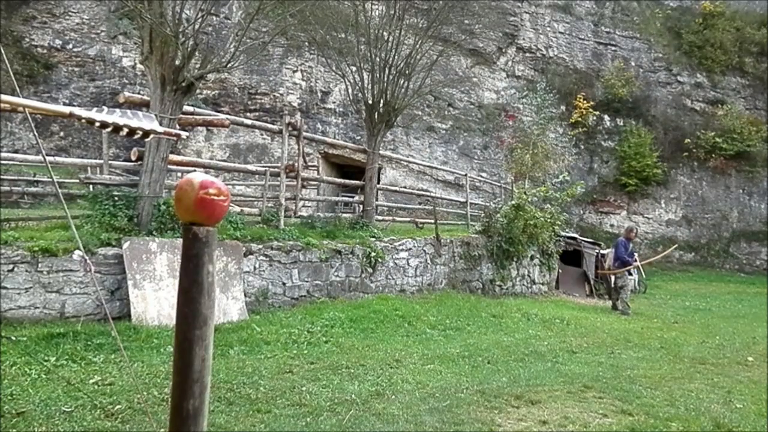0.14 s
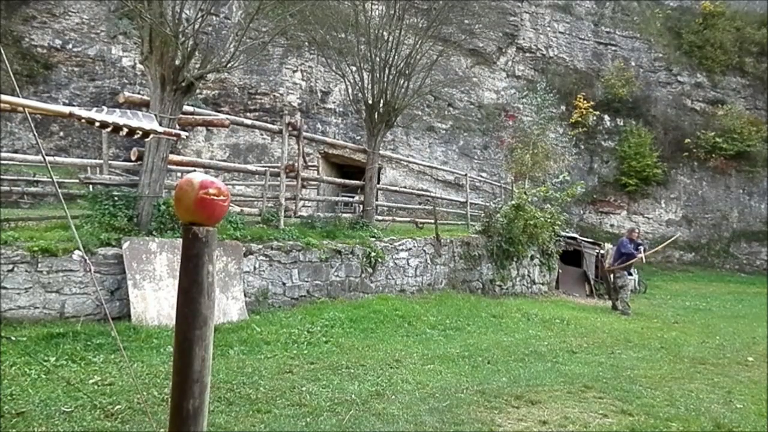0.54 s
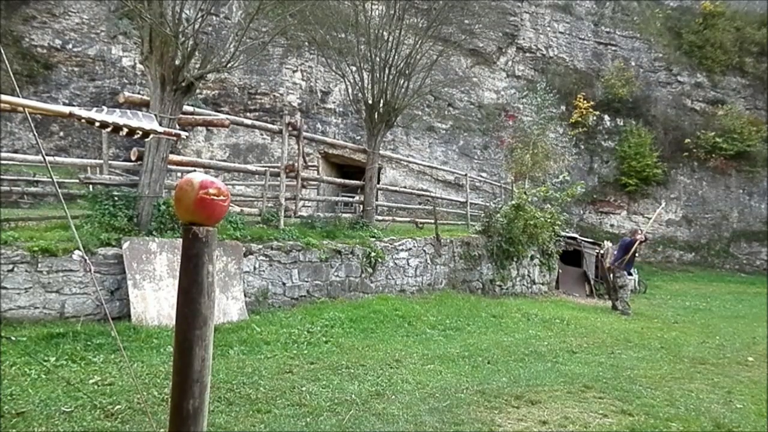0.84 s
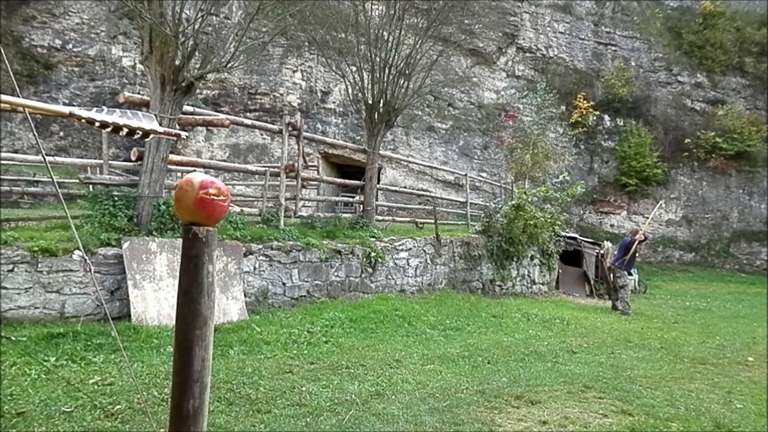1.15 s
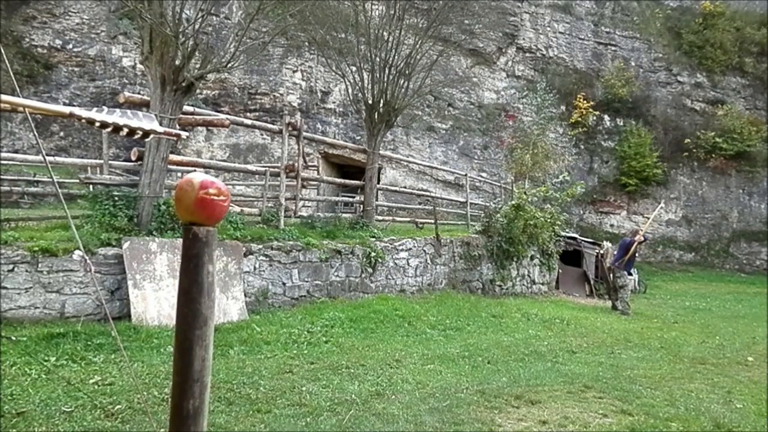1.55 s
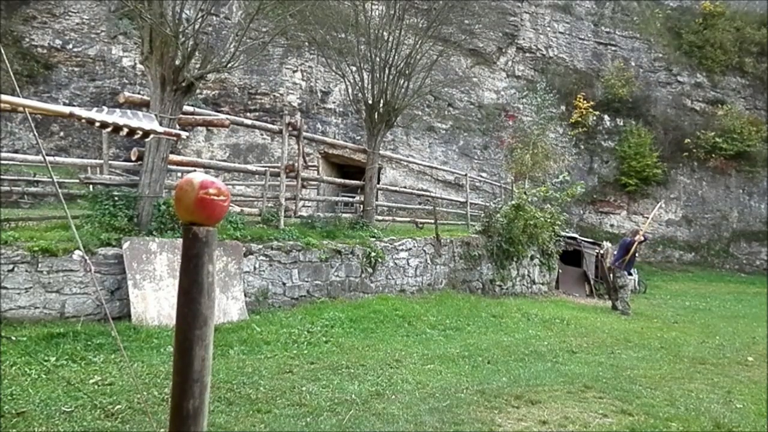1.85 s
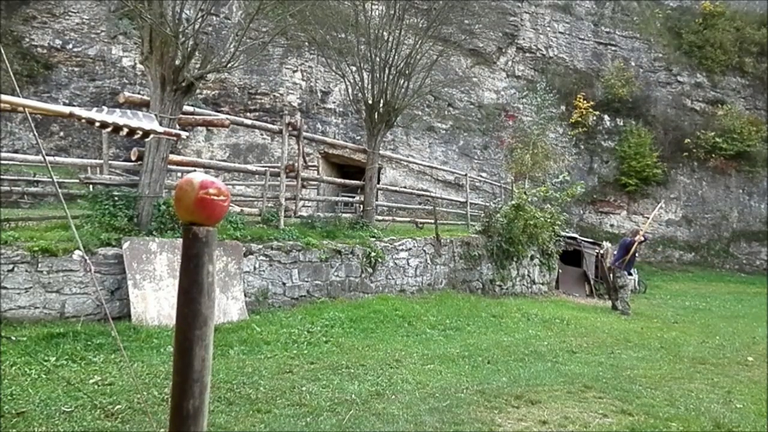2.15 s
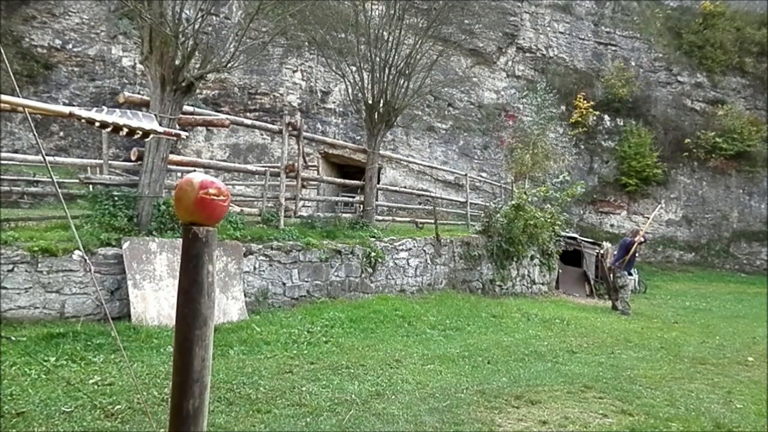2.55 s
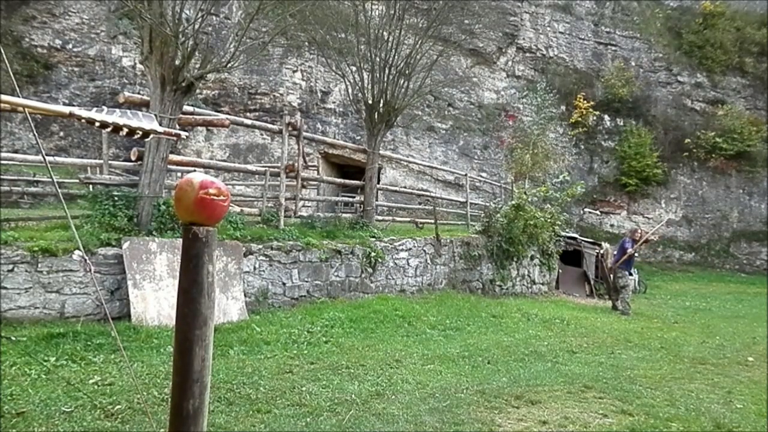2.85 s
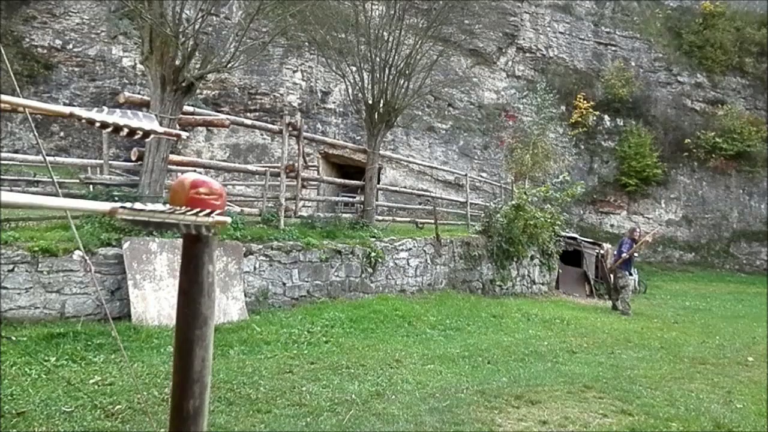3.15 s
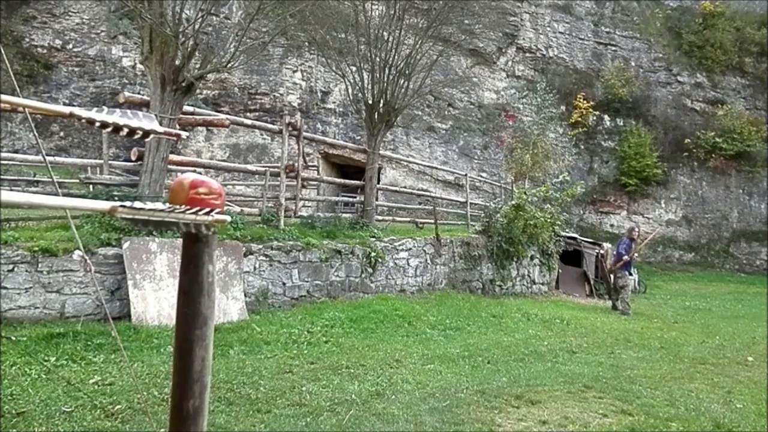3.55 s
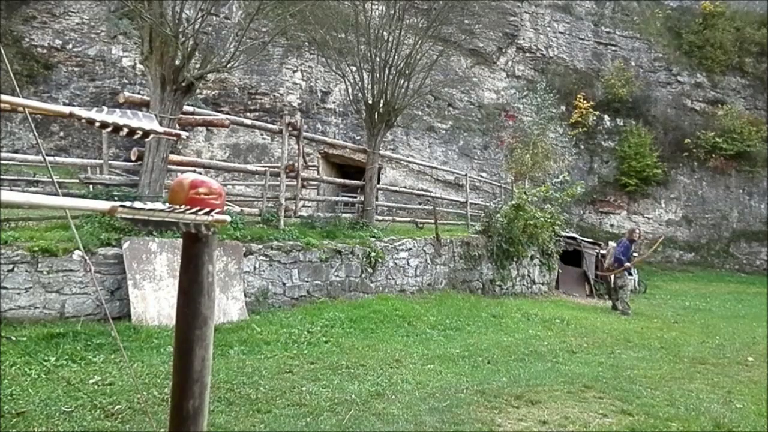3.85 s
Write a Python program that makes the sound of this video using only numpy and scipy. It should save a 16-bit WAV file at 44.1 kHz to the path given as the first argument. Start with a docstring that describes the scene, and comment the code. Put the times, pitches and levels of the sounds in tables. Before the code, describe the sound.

An arrow hits an apple on a wooden post outdoors. Low wind runs throughout, with faint rapid ticking and a thin high whine. At about 2.7 seconds a distant bowstring thumps with a light clack, and feathers hiss closer. At 3 seconds comes a close, sharp crunch and thud, then two quick shaft knocks and a faint feather rustle. The background dips afterwards and recovers toward 4 seconds.

```python
"""Low wind on a meadow under a cliff, with the camera's own faint ticking and thin whine.
An archer 18 m off lays an arrow on the bow and looses it: the string thumps, the shaft clacks past.
The feathers hiss nearer and the cliff scatters the hiss back. Close to the microphone the point
crunches into an apple on a wooden post; the post thuds and the swinging shaft knocks on it twice.
The camera's gain control ducks after the hit and slowly recovers."""
import sys
import numpy as np
from scipy import signal
from scipy.fft import rfft, irfft
from scipy.io import wavfile
from scipy.ndimage import uniform_filter1d, minimum_filter1d

SR = 44100
rng = np.random.default_rng(int(sys.argv[2]) if len(sys.argv) > 2 else 0)


def unload_wav(signal):
    """Save mono or channel-first audio to the path in sys.argv[1] as 16-bit WAV at rate SR, clipped to [-1, 1]."""
    wavfile.write(
        sys.argv[1],
        SR,
        np.round(np.clip(np.atleast_2d(signal).T, -1, 1) * 32767).astype(np.int16),
    )


N = 176400
T = np.arange(N) / SR
RELEASE_S, HIT_S = 2.693, 2.9929

# Low wind and distant rumble. Each row: frequency in Hz, relative density in dB.
WIND_SPECTRUM = [(20, -11.5), (45, -3), (90, 0.5), (160, 1.5), (400, -4.5), (660, -9), (1100, -21.5),
                 (1600, -36.5), (3000, -57), (6000, -79)]
# Faint hiss above the wind. Each row: frequency in Hz, relative density in dB.
HISS_SPECTRUM = [(900, -8.5), (1500, 0), (2600, -4.5), (4000, -17), (11800, -42), (12600, -14.5),
                 (14500, -12), (15500, -40)]
# That hiss sinks for a moment after the hit. Each row: time in seconds, gain in dB.
HISS_DIP = [(3.05, -0.5), (3.33, -26.5), (3.9, -3)]

# Strength of the camera's ticking. Each row: time in seconds, level in dB.
TICK_LEVELS = [(0, -59.5), (.5, -57.5), (.7, -70), (.92, -64), (1.17, -69), (1.3, -64.5), (1.45, -71),
               (1.8, -59.5), (2.25, -56), (2.55, -67.5), (3.15, -66), (3.3, -82), (3.68, -86),
               (3.76, -63.5)]
# Where the ticking falters. Each entry: time in seconds.
TICK_GAPS = [.614, 1.548, 2.415]
# Ring of a tick. Each row: frequency in Hz, gain in dB, t60 in seconds.
TICK_RESONANCES = [(4850, -7, .008), (6150, -12, 0.009), (7450, -4.5, .006), (8460, -2, 0.0052)]
# Rustle around a tick. Each row: frequency in Hz, relative density in dB.
TICK_RUSTLE_SPECTRUM = [(4000, -21), (4850, 5.5), (5400, -14), (6100, 1.5), (6550, -13), (7100, 1.5),
                        (8900, 0.5), (9500, -41)]
# Tones of the electronics. Each row: frequency in Hz, rms level in dB.
WHINE_TONES = [(14955, -76), (15315, -78.5), (15375, -77.5), (15434, -82.5)]
# Narrow hiss under them. Each row: frequency in Hz, relative density in dB.
WHINE_SPECTRUM = [(14000, -44.5), (14800, 5), (15650, 1), (16000, -42)]

# The arrow is laid on the bow, then scrapes past it.
# Each row: start in seconds, level in dB, attack and t60 in seconds, centre and width in Hz.
ARROW_RUBS = [(0.54, -45, 0.0021, 0.026, 630, 300), (2.674, -47.5, .008, 0.12, 770, 250),
              (2.6912, -47.5, .005, .06, 8500, 13500), (2.7041, -35, .0003, .009, 9600, 1700),
              (2.704, -57.5, .002, 0.09, 8700, 1700), (2.682, -50, 0.014, 0.2, 1050, 1160)]
# The shaft clicks as it is loosed, then clacks against the bow.
# Each row: start in seconds, strength in dB, contact in seconds.
SHAFT_CLACKS = [(2.6738, -38.5, .00016), (2.7043, -37.5, .00008)]
# Ring of the shaft. Each row: frequency in Hz, gain in dB, t60 in seconds.
SHAFT_RESONANCES = [(500, -3.5, 0.047), (850, -8, 0.029), (1305, -9.5, 0.019), (2370, -8.5, .009),
                    (3300, -3.5, 0.0029), (4400, -6, .004)]
# The string drives the bow, then snaps taut.
# Each row: start in seconds, strength in dB, contact in seconds.
STRING_BLOWS = [(2.6908, -28.5, 0.0021), (2.6982, -39.5, 0.0019)]
# Ring of bow and string. Each row: frequency in Hz, gain in dB, t60 in seconds.
BOW_RESONANCES = [(65, -6, .2), (154, -3, 0.061), (238, -1.5, 0.064), (287, -3.5, .06), (421, -12.5, 0.066),
                  (548, -16.5, .2), (686, -7, .12), (1130, -15, .1)]
# Air rushing through the feathers. Each row: frequency in Hz, relative density in dB.
FLIGHT_SPECTRUM = [(600, -9), (2700, -8), (4000, -11.5), (7100, -12.5), (8500, -5), (11300, -11),
                   (15600, -4.5), (16000, -30)]

# The arrow drives in and the post kicks back.
# Each row: start in seconds, strength in dB, contact in seconds.
POST_KICKS = [(2.9927, -16.5, .0005), (2.9972, -16.5, .0012), (3.0078, -21, .0005), (3.026, -28, .002),
              (3.052, -36.5, .002)]
# Ring of post and apple. Each row: frequency in Hz, gain in dB, t60 in seconds.
POST_RESONANCES = [(42, -10, .36), (137, -2.5, .04), (201, -2, 0.037), (293, -1, .06), (368, -4.5, .04),
                   (482, -8, .035), (608, -12, 0.032), (809, -15, 0.021)]
# Fruit and wood split. Each row: start in seconds, level in dB, t60 in seconds.
SPLITS = [(2.9929, -21.5, .007), (2.9942, -25.5, 0.033), (2.9976, -32.5, 0.043), (3.022, -52, 0.19)]
# Colour of the crunch. Each row: frequency in Hz, relative density in dB.
CRUNCH_SPECTRUM = [(1200, -7.5), (1700, -8.5), (2400, -1.5), (3300, -6.5), (4200, -0.5), (5200, -6),
                   (6300, 4.5), (7200, 0.5), (8700, 6), (10300, -5), (12500, -5), (14800, 3),
                   (16500, -10.5)]
# Brief ring of point and shaft. Each row: frequency in Hz, gain in dB, t60 in seconds.
POINT_RESONANCES = [(6380, 3, 0.044), (7800, -1.5, 0.031), (8160, -3, .035), (9340, -4, .04),
                    (14800, 1.5, .04)]
# Quivering feathers. Each row: frequency in Hz, relative density in dB.
FEATHER_SPECTRUM = [(4000, -22.5), (8900, -9), (10300, -33), (12200, -1), (13200, 2.5), (16000, -11)]
# The shaft strikes the post. Each row: start in seconds, strength in dB, contact in seconds.
SHAFT_KNOCKS = [(3.0277, -27, .00004), (3.0763, -24, .00008), (3.0813, -27, 0.00072)]


def from_db(db):
    """Decibels to gain."""
    return 10 ** (np.asarray(db) / 20)


def butterworth(x, order, hz, kind):
    """Low-, high- or band-pass filter."""
    return signal.sosfilt(signal.butter(order, hz, kind, fs=SR, output="sos"), x)


def noise(spectrum):
    """Steady noise, rms 1, coloured by (Hz, dB) points."""
    hz, db = np.transpose(spectrum)
    f = np.maximum(np.arange(N // 2 + 1) * SR / N, 1)
    skirt = np.minimum(f / hz[0], 1) ** 2
    colour = from_db(np.interp(np.log(f), np.log(hz), db))
    x = irfft(rfft(rng.standard_normal(N)) * skirt * colour, N)
    return x / x.std()


def burst(start, attack, t60, hold=0):
    """Straight rise, an optional hold, then exponential decay; times in seconds."""
    rise = np.clip((T - start) / attack, 0, 1)
    return rise * from_db(-60 * np.maximum(T - start - attack - hold, 0) / t60)


def pushes(rows):
    """One rounded push of force for each (start s, dB, contact s)."""
    force = np.zeros(N)
    for start, db, contact in rows:
        shape = np.hanning(int(contact * SR) + 3)[1:-1]
        i = int(start * SR)
        force[i:i + len(shape)] += from_db(db) * shape / shape.sum()
    return force


def ring(force, modes):
    """A body answers a force with its decaying modes."""
    out = 0
    for hz, db, t60 in modes:
        r, w = from_db(-60 / (t60 * SR)), 2 * np.pi * hz / SR
        mode = signal.lfilter([0, np.sin(w)], [1, -2 * r * np.cos(w), r * r], force + 1e-18)
        out = out + from_db(db) * mode
    return out


def wind():
    """Dull air over the meadow sways slowly and flutters quickly, under a faint hiss."""
    sway_db = 0.61 * noise([(2, 0), (12, -6), (60, -60), (300, -140)])
    flutter_db = 0.92 * noise([(15, 0), (70, 0), (400, -60)])
    hiss = from_db(-73.5 + np.interp(T, *np.transpose(HISS_DIP))) * noise(HISS_SPECTRUM)
    return from_db(-49.3 + sway_db + flutter_db) * noise(WIND_SPECTRUM) + hiss


def camera_ticking():
    """Probably the lens motor: fifteen double ticks a second, each in a soft rustle, a few missed."""
    first_s, period_s, bounce_s, rustle_s = .0136, .066733, .00081, .015
    times = np.arange(first_s, T[-1] - period_s / 2, period_s)
    levels = np.interp(times, *np.transpose(TICK_LEVELS)) + rng.normal(0, 1.6, len(times))
    missed = np.abs(times[:, None] - TICK_GAPS).min(axis=1) < period_s / 2
    levels = np.where(missed, -120, levels)
    steps = pushes([(s, db, 0) for s, db in zip(times, levels)])
    bounces = pushes([(s + bounce_s, db - 3, 0) for s, db in zip(times, levels)])
    ticks = butterworth(ring(steps + bounces, TICK_RESONANCES), 8, [4200, 9000], "band")
    nearest = np.clip(np.round((T - first_s) / period_s).astype(int), 0, len(times) - 1)
    full_db, share = -57, 0.82  # the rustle follows only part of the ticks' swing from full strength
    rustle_db = full_db - 19.5 + share * (levels[nearest] - full_db)
    swell = np.exp(-.5 * ((T - times[nearest]) / rustle_s) ** 2)
    return ticks + from_db(rustle_db) * swell * noise(TICK_RUSTLE_SPECTRUM)


def camera_whine():
    """The electronics add thin high tones on a narrow, buzzing hiss."""
    tones = sum(np.sqrt(2) * from_db(db) * np.sin(2 * np.pi * (hz * T + rng.random()))
                for hz, db in WHINE_TONES)
    buzz = 1 + .7 * np.sin(2 * np.pi * 59.94 * T)
    return tones + from_db(-73) * buzz * noise(WHINE_SPECTRUM)


def bow():
    """Across the meadow the arrow rubs and clacks on the bow, and the string thumps."""
    rubs = 0
    for start, db, attack, t60, hz, width in ARROW_RUBS:
        edges = np.clip([hz - width / 2, hz + width / 2], 200, .45 * SR)
        friction = butterworth(rng.standard_normal(N), 2, edges, "band")
        rubs = rubs + from_db(db) * burst(start, attack, t60) * friction / friction.std()
    clacks = ring(pushes(SHAFT_CLACKS), SHAFT_RESONANCES)
    thump = ring(pushes(STRING_BLOWS), BOW_RESONANCES)
    return rubs + clacks + butterworth(thump, 2, 55, "high")  # a small body radiates little deep bass


def arrow_flight():
    """Feather hiss grows as it nears the microphone, over the fading scatter from the cliff."""
    archer_m, post_m, falloff = 18, 3.5, 1.8
    distance = np.interp(T, [RELEASE_S, HIT_S], [archer_m, post_m])
    airborne = (T > RELEASE_S) & (T < HIT_S)
    direct = from_db(-51.5) * (post_m / distance) ** falloff * airborne
    cliff = from_db(-60) * burst(RELEASE_S, attack=0.013, t60=0.37)
    return np.hypot(direct, cliff) * noise(FLIGHT_SPECTRUM)


def post_thud():
    """The nearby post takes the blow; it radiates little deep bass and the soft fruit muffles it."""
    thud = ring(pushes(POST_KICKS), POST_RESONANCES)
    thud = butterworth(thud, 2, 77, "high")
    return butterworth(thud, 4, 1010, "low")


def point_crunch():
    """The point tears through fruit and wood in grainy bursts and rings briefly."""
    tearing = sum(from_db(db) * burst(start, 0.00014, t60) for start, db, t60 in SPLITS)
    roughness = 0.25
    grain = np.exp(roughness * noise([(300, 0), (1500, 0), (6000, -40)]) - roughness ** 2)
    point = ring(pushes([(HIT_S, -41.5, 0)]), POINT_RESONANCES)
    return tearing * grain * noise(CRUNCH_SPECTRUM) + point


def feather_rustle():
    """The feathers rustle in patches while the lodged shaft quivers, then stop."""
    patches_db = 2 * noise([(15, 0), (50, 0), (200, -60)])
    quiver = burst(HIT_S, attack=.09, t60=0.24, hold=0.13)
    return from_db(-57.5 + patches_db) * quiver * noise(FEATHER_SPECTRUM)


def shaft_knocks():
    """The swinging shaft knocks on the post and rings."""
    return ring(pushes(SHAFT_KNOCKS), SHAFT_RESONANCES)


def scene():
    """Everything at the one microphone, a few metres from the post."""
    background = wind() + camera_ticking() + camera_whine()
    shot = bow() + arrow_flight()
    hit = post_thud() + point_crunch() + feather_rustle() + shaft_knocks()
    return (background + shot + hit)[None]


def record(dry):
    """The camera's gain control ducks on a loud sound, holds and slowly recovers; the top is cut."""
    threshold_db, duck_db_per_db, max_duck_db = -25.5, 4, 17
    attack_s, hold_s, recovery_db_per_s, cutoff_hz = .03, 0.28, 20.5, 16100
    level_db = 10 * np.log10(np.abs(uniform_filter1d(dry[0] ** 2, size=256)) + 1e-12)
    wanted_db = np.clip((level_db - threshold_db) * duck_db_per_db, 0, max_duck_db)
    half_hold = int(hold_s * SR / 2)
    held_db = -minimum_filter1d(-wanted_db, 2 * half_hold + 1, origin=half_hold, mode="constant")
    recovery_db = recovery_db_per_s * T
    duck_db = np.maximum.accumulate(held_db + recovery_db) - recovery_db
    pole = np.exp(-1 / (attack_s * SR))
    gain = from_db(-signal.lfilter([1 - pole], [1, -pole], duck_db))
    return signal.sosfilt(signal.ellip(10, .1, 80, cutoff_hz, fs=SR, output="sos"), dry * gain)


dry = scene()
out = record(dry)
unload_wav(out)
```